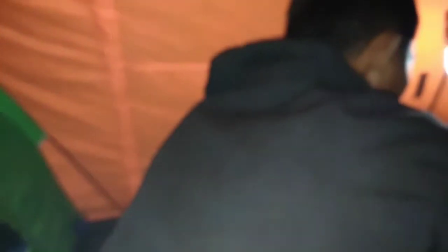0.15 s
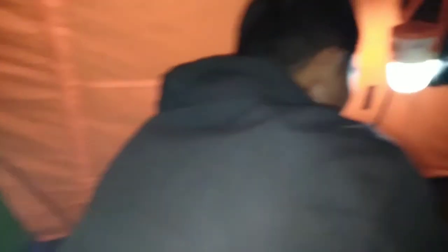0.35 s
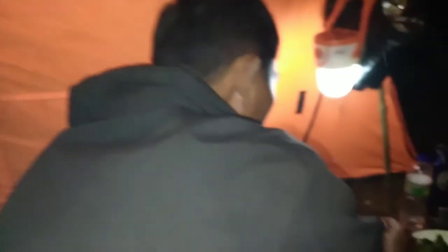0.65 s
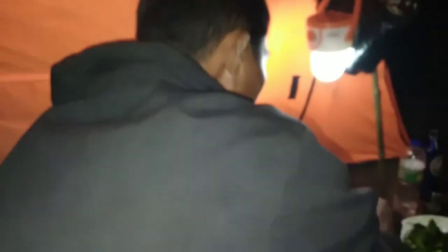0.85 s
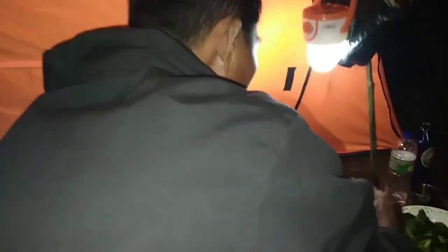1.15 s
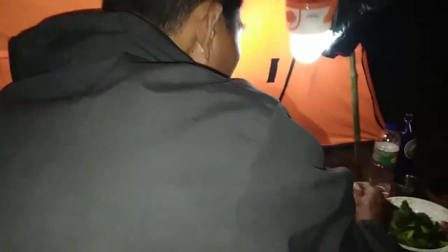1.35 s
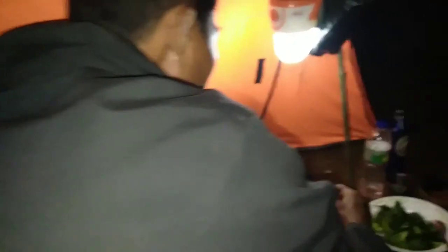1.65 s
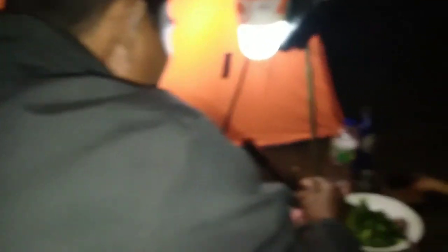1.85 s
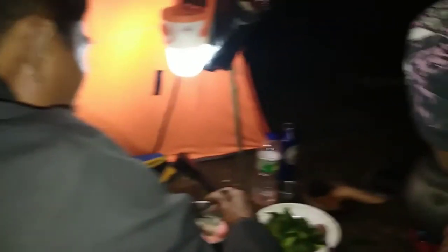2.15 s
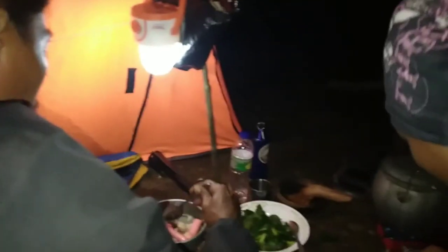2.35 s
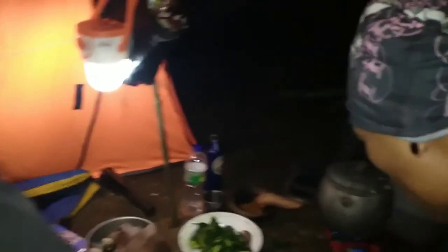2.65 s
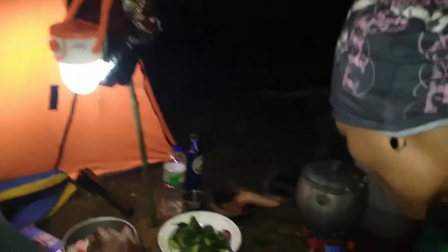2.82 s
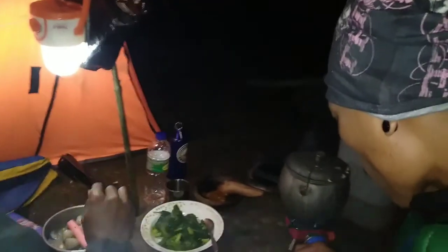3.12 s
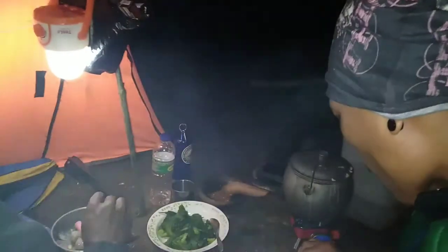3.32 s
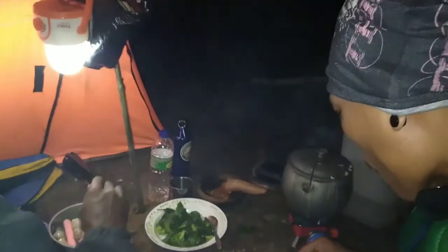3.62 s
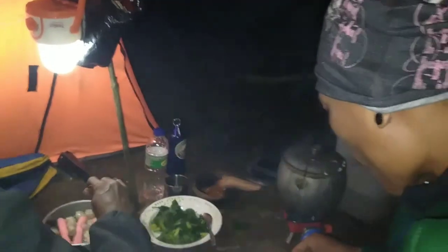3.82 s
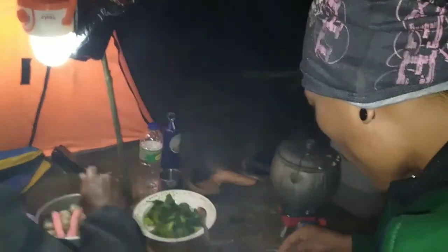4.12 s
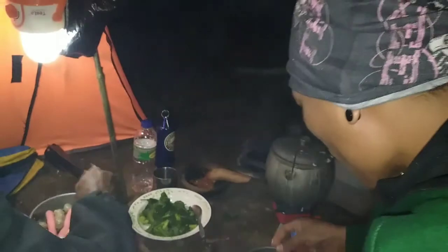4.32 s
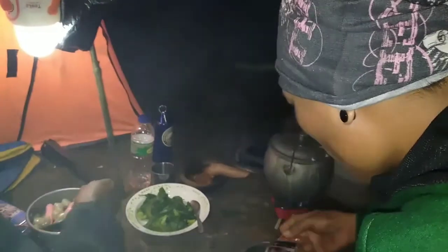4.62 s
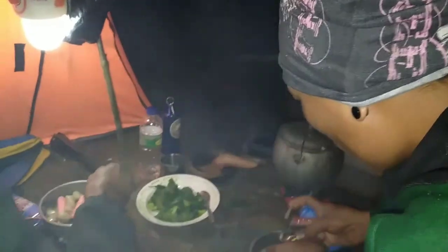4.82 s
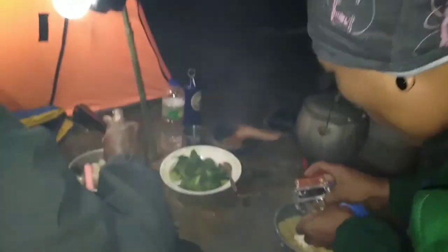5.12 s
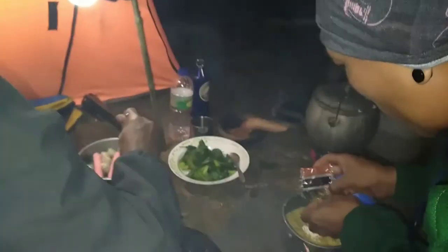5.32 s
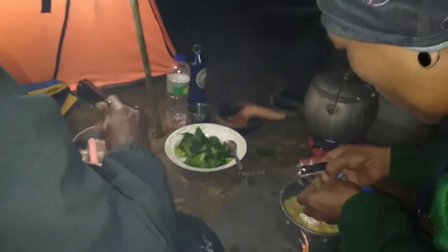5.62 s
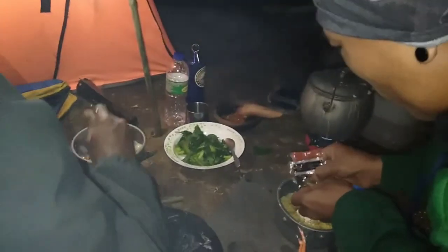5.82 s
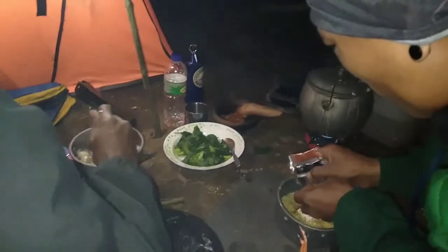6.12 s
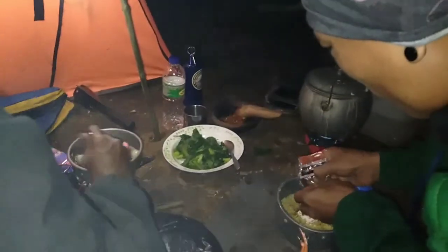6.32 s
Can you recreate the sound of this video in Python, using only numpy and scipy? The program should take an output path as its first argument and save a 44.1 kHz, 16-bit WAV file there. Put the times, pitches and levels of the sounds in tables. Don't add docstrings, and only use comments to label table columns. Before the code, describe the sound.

Outdoors at night, close to a phone microphone, a gas burner hisses steadily above a low fluttering flame rumble. Hands rustle thin plastic packaging almost constantly, with bright crackles and sharp knocks. Spoons tap and briefly scrape on plates, mostly in the first half. Late on, one hard metallic clank of a tin stands out, then lighter rustling and a last cluster of taps.

```python
import sys
import numpy as np
from scipy import signal
from scipy.fft import rfft, irfft
from scipy.io import wavfile
from scipy.ndimage import uniform_filter1d, map_coordinates

SR = 44100
rng = np.random.default_rng(int(sys.argv[2]) if len(sys.argv) > 2 else 0)


def wrap_up_sound(samples):
    columns = np.atleast_2d(samples).T
    tamed = np.clip(columns, -1, 1)
    steps = np.round(tamed * 32767).astype(np.int16)
    wavfile.write(sys.argv[1], SR, steps)


def convert_level_to_amplitude(level_db):
    exponent = np.asarray(level_db, float) / 20
    return 10 ** exponent


N = 285327
HZ = np.fft.rfftfreq(N, 1 / SR)

# f/Hz, level/dB
FLAME_SPECTRUM = [(15, -49), (25, -19.5), (90, 1), (129, 4), (179, 2), (295, -8), (1060, -11), (1310, -44),
                  (1500, -29), (1950, -85), (3300, -120)]
# f/Hz, level/dB
JET_SPECTRUM = [(710, -49), (1200, -44), (1510, -50), (1890, -13), (2320, -59), (2650, -10), (3110, -14),
                (3550, -2), (4450, -9.5), (6650, -9.5), (7910, -8), (9310, -2), (11400, -9.5), (15200, -7),
                (16000, -16)]
# t/s, level/dB
DRAUGHT = [(0, 1), (.4, -1.5), (1.5, 0.5), (2.4, 0), (3.8, 1), (4.7, -1), (5.2, -0.5), (5.7, 1), (6.1, 2),
           (6.47, 1)]
# t/s, delay of long waves at the left port/samples
TURN = [(0, -4), (1.4, -3), (2.2, 0), (3, 1.5), (5.22, 1.5), (5.27, 7), (5.4, 7), (5.45, 1.5), (6.47, 2.5)]
# f/Hz, level/dB
FILM_SPECTRUM = [(180, -63), (300, 5), (593, -24.5), (787, -21.5), (1120, -16), (1430, -23.5),
                 (1720, -22.5), (2070, -21), (3700, -13), (4590, -14.5), (6100, -14.5), (8090, -8),
                 (9300, 1.5), (10700, -9), (16000, -32)]
BAND_EDGES = (620, 2000, 6500, 11500, 16000)
LEFTWARD = np.array([-1.2, 7.0, 4.5, 1.5])
# t/s, rustle level/dB, weight of the grip/dB
BUSY = [(0, -40, 4), (.18, -29, -5), (.45, -28, -0.5), (.67, -23.5, -6.5), (.83, -27.5, 2.5),
        (1.19, -27, -10), (1.36, -28.5, 4.5), (1.93, -25.5, -10.5), (2.16, -26, -5.5), (2.65, -24, -6),
        (2.96, -22.5, -21), (3.22, -28, 0.5), (3.91, -26.5, -1), (4.45, -24, -10), (5.261, -31.5, -6),
        (5.58, -30.5, -6.5), (6.2, -25, -11.5), (6.47, -33, 0.5)]
# peak t/s, level/dB, build/s, fade/s, weight of the grip/dB
PULLS = [(0.108, -19.5, 0.058, .055, 7), (.4, -21.5, 0.092, 0.05, -0.5), (.74, -13, 0.046, 0.063, -2),
         (1.52, -23, 0.14, 0.14, 13), (2.03, -20, 0.088, 0.11, 13), (2.1, -34.5, 0.083, 0.13, 21.5),
         (2.43, -21.5, 0.04, 0.09, -14), (2.69, -20.5, 0.028, 0.14, 14.5), (2.92, -19.5, 0.11, 0.037, 4.5),
         (3.262, -20, 0.031, 0.052, 9.5), (3.55, -20.5, 0.14, 0.052, 5), (3.39, -20.5, 0.069, 0.025, 5.5),
         (4.03, -27.5, 0.053, 0.047, 12), (3.71, -22, 0.085, 0.11, 0.5), (4.12, -15, 0.11, 0.063, 6.5),
         (4.24, -21, 0.12, 0.14, 11), (5.92, -28.5, 0.031, 0.18, 4), (5.53, -15, 0.017, 0.033, -22),
         (6.31, -30.5, 0.069, 0.25, 16.5)]
RUSTLE_COLOUR = np.array([-14.0, -4.5, -3.5, -5.0])
PULL_COLOUR = np.array([-25.0, -9.5, -2.5, -5.0])
WEIGHT_SHARE = np.array([0.99, 0.47, 0.013, 0.2])
# t/s, peak level/dB, low f/Hz, high f/Hz, high minus low level/dB
TAPS = [(0.07, -24, 1010, 3780, -7), (.641, -22, 1054, 3800, -12), (.686, -21.5, 980, 3500, -10),
        (0.875, -16, 950, 3670, 0.5), (0.998, -19, 1180, 3970, -1), (1.357, -11.5, 1164, 5090, 9.5),
        (1.392, -12, 1090, 4170, -10), (1.569, -17.5, 1115, 4460, -3), (1.621, -17.5, 840, 3600, -18),
        (1.945, -13, 864, 3520, -11), (2.014, -19, 960, 3780, -9), (2.072, -16.5, 800, 4030, -10),
        (2.662, -14.5, 1180, 3700, -27), (2.761, -13.5, 1594, 4640, 3), (2.915, -19, 1095, 5100, -12),
        (3.255, -12, 1116, 3630, -12), (5.296, -1, 928, 2760, 0), (6.238, -24.5, 1370, 4600, 12),
        (6.297, -21, 1120, 4140, 7)]
# t/s, peak level/dB, body minus peak/dB, rasp minus peak/dB
KNOCKS = [(0.072, -14, -9.5, 0.5), (.2458, -14.5, -22, -30), (0.6404, -23, -3.5, 11),
          (.829, -12.5, -18.5, -8), (0.873, -21.5, -16, 1), (0.953, -11, -17, -14),
          (0.977, -13, -14.5, -10), (1.025, -26, -2, -7), (1.355, -3, -16, -3), (1.3887, -6.5, -15, -17),
          (1.558, -4.5, -28, -12), (1.75, -14, -12.5, -27), (1.938, -8.5, -9, -7.5),
          (2.1736, -20.5, -6, -6), (2.416, -13, -30, -18), (2.7596, -4, -32, -3), (2.8664, -13, -15.5, -4),
          (2.9086, -20, -21, -22), (3.254, -1.5, -17.5, -5.5), (3.525, -11, -21, -21),
          (4.0018, -8.5, -20, -22), (4.3974, -8, -19.5, -12.5), (5.184, -16.5, -15, -7),
          (5.273, -22, -31, -15), (5.2932, -22.5, 8.5, 21.5), (5.4093, -12, -21.5, -8.5),
          (5.878, -26, -26, 6), (6.2362, -6, -12.5, 0), (6.286, -12.5, -32, -4), (6.299, -9.5, -3, 3.5)]
# t/s, peak level/dB
CRINKLES = [(0.095, -2.5), (1.1607, -9), (1.8154, -6), (1.973, 0), (2.032, -1), (2.116, 4), (2.141, -5),
            (2.211, -14), (2.27, -3.5), (2.4844, -4.5), (2.5297, -6), (2.9963, -10), (3.113, -9),
            (3.411, -6), (3.549, -7), (3.691, -16), (4.083, -7), (4.6575, -8), (4.754, -6.5),
            (5.5286, -7.5), (5.594, -10.5), (5.6492, -9.5), (1.46, -30), (1.5, -10), (1.687, -7),
            (4.422, -10), (4.935, -18), (5.08, -14.5), (5.454, -15), (5.7, -28)]
# t/s, peak level/dB
CRACKS = [(.344, -5.5), (.6174, -7.5), (.699, -6), (.771, -18), (2.053, -1.5), (2.358, -18.5),
          (2.5144, -23), (2.672, -10), (2.679, -3), (3.0665, -10.5), (3.495, -10), (3.979, -18),
          (4.2486, -6), (4.363, -12.5), (4.6414, -3.5), (5.746, -12.5), (5.836, -9.5), (6.0445, -18),
          (6.126, -2), (6.1913, -21), (6.273, -6)]
# t/s, peak level/dB
TICKS = [(0.0727, -14), (0.2468, -26), (0.3401, -15), (0.4773, -17), (0.62, -11), (0.6679, -19),
         (0.7033, -23), (0.7277, -18), (0.7706, -12), (0.8734, -15), (1.3573, -15), (1.7489, -12),
         (1.939, -5), (2.3585, -28), (2.6723, -22), (2.76, -11), (3.0679, -21), (3.258, -10), (3.5374, -19),
         (3.7194, -15), (4.0821, -25), (4.2512, -23), (4.4004, -15), (4.643, -10), (4.8788, -16),
         (5.0409, -15), (5.4146, -20), (6.126, -20), (6.2382, -31), (6.3, -8)]
# t/s, length/s, level/dB, f/Hz
SCRAPES = [(.1, 0.07, -35.5, 3100), (.073, .086, -45, 1150), (.697, .044, -25, 7020),
           (.699, .066, -39, 2680), (1.545, 0.035, -33.5, 3300), (1.542, .057, -44, 1060),
           (2.673, .1, -29.5, 3700), (2.674, .12, -38.5, 1310), (2.863, .051, -34, 5200),
           (2.857, .04, -37, 1830), (2.883, .054, -41, 4350), (2.904, .04, -38, 1240),
           (3.256, .045, -29, 3900), (3.252, .054, -31, 3050), (4.081, .063, -26.5, 4640),
           (4.079, .076, -31, 3510), (4.206, 0.075, -31, 4580), (4.209, .068, -33.5, 3560),
           (5.881, .061, -35, 5470), (5.878, 0.09, -48, 2300), (6.251, .026, -39, 2830),
           (6.24, .05, -41, 1360)]
# t/s, length/s, level/dB, f/Hz
SWISHES = [(.073, 0.089, -32, 6360), (.075, .089, -31, 7700), (.073, .091, -37.5, 2900),
           (5.874, .071, -33.5, 5460), (5.871, .081, -40, 4300), (2.597, .021, -38.5, 2400),
           (2.597, .021, -33.5, 5100), (1.3555, .015, -23.5, 4400), (4.006, 0.056, -35, 6900),
           (3.976, 0.012, -26.5, 7700), (6.4, .015, -28, 7850), (5.181, .013, -32, 7800),
           (5.367, .011, -46, 1970), (5.401, 0.053, -44.5, 1920), (6.301, .031, -28, 6500),
           (5.44, 0.035, -32, 9400), (5.795, 0.048, -40.5, 3100), (1.02, .014, -32, 6700),
           (2.174, 0.014, -29.5, 7300), (.715, .06, -42, 1060), (4.84, 0.023, -44, 900),
           (5.52, .02, -37, 6500)]
# t/s, peak level/dB, rasp minus peak/dB
PRICKS = [(0.2108, -21, 0), (.557, -12, -12), (.605, -14, -10), (.736, -6, -10), (.789, -9, -12),
          (2.127, -9, -17), (2.158, -13, -15), (3.4975, -9, -15), (3.529, -11, -12), (3.541, -10, -15),
          (3.566, -10, -15), (3.72, -11, -15), (3.765, -13, -15), (5.531, -10, -10), (5.66, -19, -15),
          (0.306, -17, -5), (.388, -15, -20), (.423, -9, -2), (.977, -15, -15), (1.2481, -19, 3),
          (1.5, -14, -10), (1.645, -15.5, 2), (2.212, -15, -18), (2.4159, -12, -10), (2.453, -15, -15),
          (2.6723, -12, -5), (2.761, -5, -5), (2.766, -6, -5), (3.0674, -12.5, -11), (2.9971, -14, -15),
          (3.2226, -14, -15), (3.45, -16, 2.5), (3.691, -11, -15), (3.7878, -13, -19), (3.8422, -8, -15),
          (4.0892, -6, -2), (4.097, 2.5, -8.5), (4.112, -4, -10), (4.128, -1, -12), (4.2512, -8, -10),
          (4.27, -12, -3), (4.38, -7, -18), (4.5401, -16, -15), (4.815, -18, 0), (4.83, -10.5, -5),
          (4.8788, -12, -4.5), (4.9252, -15, -15), (4.94, -18, -12), (5.0418, -14, -8), (5.1163, -18, -17),
          (5.1432, -21, -1), (5.2745, -15, -15), (5.7189, -19, -15), (5.7936, -18, -2), (5.9713, -14, -15),
          (5.995, -13, -10), (6.0462, -14, -4), (6.143, -11, -15), (6.1913, -16, -1), (6.2901, -6, -13)]
# t/s, level/dB, f/Hz, length/s, left minus right level/dB
BUMPS = [
    (4.348, -22, 91, 0.037, -30),
    (4.407, -24, 87, 0.029, -30),
    (4.444, -38, 70, 0.053, -30),
    (5.349, -28, 360, 0.0079, 0),
    (5.945, -39.5, 140, 0.041, -1),
    (6.255, -38, 222, .06, -1),
    (6.02, -42, 190, .07, 1.5),
]
# f/Hz, level/dB, t60/s
TIN_MODES = [(229, -8.5, 1.1), (813, 2, 0.048), (1840, -2, 0.034), (2580, 8.5, 0.025), (3500, -2, 0.018),
             (4480, -7, 0.014), (5200, -2, 0.025), (5500, -24, 0.25), (495, -9, 0.034), (6540, -16, 0.059),
             (7600, -36, 0.38), (6900, 3, 0.015)]
# t/s, level/dB
TIN_BLOWS = [
    (5.2958, -11),
    (5.300, -12.5),
]


def level(x, db):
    return x * convert_level_to_amplitude(db) / np.sqrt(np.mean(x ** 2))


def colour(x, spectrum, lo_hz=1., hi_hz=3e4):
    hz, db = np.transpose(spectrum)
    f = HZ + 1
    edges = 1 / np.sqrt((1 + (lo_hz / f) ** 12) * (1 + (f / hi_hz) ** 12))
    return irfft(rfft(x) * convert_level_to_amplitude(np.interp(np.log(f), np.log(hz), db)) * edges, N)


def curve(rows):
    return np.interp(np.arange(N) / SR, *np.transpose(rows))


def walk(rate):
    k = int(SR / rate)
    steps = np.repeat(rng.standard_normal(N // k + 1), k)
    return 0.52 * uniform_filter1d(uniform_filter1d(steps, k), k)[:N]


def late(x, lag):
    return np.interp(np.arange(N) - np.round(lag), np.arange(N), x)


def ports(alike, lag):
    shared, left, right = rng.standard_normal((3, N))
    common = np.array([late(shared, lag), shared])
    return np.sqrt(alike) * common + np.sqrt(1 - alike) * np.array([left, right])


def patchy(x, depth_db, wide_hz, long_s):
    cells = signal.stft(x, nperseg=512)[2]
    coarse = rng.standard_normal((200, 800))
    pitch = np.arange(257) * SR / 512 / wide_hz
    time = np.arange(cells.shape[-1]) * 256 / SR / long_s
    grid = np.meshgrid(pitch, time, indexing="ij")
    field = convert_level_to_amplitude(depth_db * map_coordinates(coarse, grid, order=1, mode="wrap"))
    return signal.istft(cells * field, nperseg=512)[1][..., :N]


def ring(hz, t60, length=.25):
    t = np.arange(int(length * SR)) / SR
    return np.sin(2 * np.pi * hz * t) * np.exp(-np.log(1000) * t / t60)


def add(out, sound, s):
    i = int(s * SR)
    out[..., i:i + sound.shape[-1]] += sound[..., :N - i]


def stove():
    flame_db = -46
    flame = level(colour(ports(0.93, lag=0), FLAME_SPECTRUM), flame_db)
    flame = flame * convert_level_to_amplitude(3.8 * walk(50) + curve(DRAUGHT))
    air = level(colour(ports(0, lag=0), FLAME_SPECTRUM, hi_hz=112.0), flame_db - 33.0)
    air = air * convert_level_to_amplitude(np.array([[-9.], [3.]]))
    hiss = patchy(ports(0.14, lag=-1.6), depth_db=3.5, wide_hz=198.0, long_s=.06)
    shaded = [colour(port, [(1200, 0), (4400, db), (8000, 1.3 * db), (15000, -.5 * db)])
              for port, db in zip(hiss, (2.5, -2.5))]
    jet = level(colour(np.array(shaded), JET_SPECTRUM), -33.5) * convert_level_to_amplitude(0.28 * walk(23.3))
    return flame + air + jet


def creases(rate, spread_db, t60):
    when, size = rng.random(N), rng.exponential(size=N)
    kicks = (when < rate / SR) * convert_level_to_amplitude(spread_db * np.minimum(size, 4)) ** 2
    fall = np.exp(-2 * np.log(1000) / (t60 * SR))
    power = signal.lfilter([1], [1, -fall], kicks)
    return np.sqrt(power / power.mean())


def film_bands(patch_share=1):
    near = patchy(ports(0.44, lag=curve(TURN)), depth_db=6.2 * patch_share, wide_hz=170.7, long_s=.035)
    scattered = patchy(ports(0.083, lag=6), depth_db=4.1 * patch_share, wide_hz=198.4, long_s=.03)
    sides = convert_level_to_amplitude(np.outer(LEFTWARD, [.5, -.5]))[..., None]
    edges = zip((near, scattered, scattered, scattered), BAND_EDGES, BAND_EDGES[1:])
    return sides * [level(colour(noise, FILM_SPECTRUM, lo, hi), 0) for noise, lo, hi in edges]


def band_power(db, colour_db, weight):
    return convert_level_to_amplitude(db + np.reshape(colour_db, (4, 1)) + np.reshape(WEIGHT_SHARE, (4, 1)) * weight) ** 2


def handling(bands):
    t = np.arange(N) / SR
    s, db, weight = np.transpose(BUSY)
    power = band_power(np.interp(t, s, db), RUSTLE_COLOUR, np.interp(t, s, weight))
    for s, db, build, fade, weight in PULLS:
        away = np.maximum((s - t) / build, (t - s) / fade) ** 1.65
        power = power + band_power(0, PULL_COLOUR, weight) * convert_level_to_amplitude(db - 12 * away) ** 2
    fine = creases(rate=500.0, spread_db=2.0, t60=0.025)
    coarse = .26 * np.log(1e-3 + creases(rate=200.0, spread_db=4.0, t60=0.07))
    crackle_share = 0.11
    separate = creases(rate=70., spread_db=0.5, t60=0.038) ** 2
    crackle = np.sqrt(1 - crackle_share * (1 - separate))
    gate = convert_level_to_amplitude(-2.5) * crackle * fine ** 0.27 * np.exp(coarse)
    return gate * (np.sqrt(power)[:, None] * bands).sum(axis=0)


def taps():
    out = np.zeros(N)
    t60 = 0.042
    for s, db, low_hz, high_hz, high_db in TAPS:
        contact = np.diff(rng.standard_normal(256) * np.exp(-np.arange(256) / SR / 0.0022))
        low_modes = (ring(low_hz, t60) + 0.5 * ring(1.1 * low_hz, 1.28 * t60)
                     + 0.27 * ring(1.47 * low_hz, 0.15 * t60) + 0.076 * ring(0.54 * low_hz, 0.5 * t60))
        high_modes = (ring(high_hz, 0.77 * t60) + 0.64 * ring(1.093 * high_hz, 0.66 * t60)
                      + 0.58 * ring(0.68 * high_hz, 0.42 * t60) + 0.39 * ring(0.28 * high_hz, 0.35 * t60))
        low = np.convolve(contact, low_modes)
        high = np.convolve(contact, high_modes)
        both = low / low.max() + convert_level_to_amplitude(high_db + 4.5) * high / high.max()
        add(out, convert_level_to_amplitude(db - 6.0) * both, s)
    return np.array([late(out, curve(TURN)), out])


def snaps(bands):
    gate = np.zeros((4, N))
    t = np.arange(int(.15 * SR)) / SR
    events = [(*e, -33, -38, 0.036) for e in CRINKLES]
    events += [(*e, -36, -11.5, 0.035) for e in CRACKS]
    events += [(*e, 0.069) for e in KNOCKS]
    for s, db, body, rasp, t60 in events:
        shape = np.minimum(t / 0.002, 1) * np.exp(-np.log(1000) * t / t60)
        add(gate, convert_level_to_amplitude(db - 6.0 + np.array([[body], [rasp], [0], [-13]])) * shape, s)
    ragged = creases(rate=2000.0, spread_db=6.5, t60=0.018) ** 0.34
    return ragged * (gate[:, None] * bands).sum(axis=0)


def ticks():
    gate = np.zeros(N)
    t = np.arange(int(.03 * SR)) / SR
    for s, db in TICKS:
        add(gate, convert_level_to_amplitude(db - 5.5) * np.minimum(t / 0.00065, 1) * np.exp(-t / 0.0058), s)
    bright = colour(ports(0.15, lag=2.6), [(2000, -42), (6000, -26), (12000, 11), (16000, 13)])
    return gate * level(bright, 0) * convert_level_to_amplitude(np.array([[-.8], [.8]]))


def drag(length, db, hz, turns, steep=False):
    t = np.arange(int(length * SR)) / SR
    slip = rng.standard_normal((2, SR // 2))[:, :len(t)]
    slip = slip * np.minimum(t / 0.0025, 1) * np.minimum((length - t) / 0.016, 1)
    slip[1] = 0.17 * slip[0] + 0.41 * slip[1]
    mode = ring(hz, turns / hz, 0.0083)
    if steep:
        mode = np.convolve(mode, mode)
    return level(signal.fftconvolve(slip, mode[None], axes=1), db)


def scrapes():
    out = np.zeros((2, N))
    for s, length, db, hz in SCRAPES:
        add(out, drag(length, db, hz, turns=72.0), s)
    return out * creases(rate=620.0, spread_db=2.0, t60=0.021) ** .5


def swishes():
    out = np.zeros((2, N))
    for s, length, db, hz in SWISHES:
        add(out, drag(length, db, hz, turns=9.8, steep=True), s)
    return out * creases(rate=900.0, spread_db=3.0, t60=0.011) ** 0.43


def pricks(bands):
    gate = np.zeros((4, N))
    t = np.arange(int(.04 * SR)) / SR
    shape = np.minimum(t / .0008, 1) * np.exp(-np.log(1000) * t / 0.018)
    for s, db, rasp in PRICKS:
        add(gate, convert_level_to_amplitude(db - 8.5 + np.array([[1.9 * rasp - 12], [rasp], [0], [-8.]])) * shape, s)
    return (gate[:, None] * bands).sum(axis=0)


def bumps():
    out = np.zeros((2, N))
    for s, db, hz, length, left_db in BUMPS:
        t = np.arange(int(length * SR)) / SR
        thud = np.sin(np.pi * t / length) ** 0.18 * np.sin(2 * np.pi * hz * t)
        add(out, convert_level_to_amplitude(db + np.array([[left_db], [0]])) * thud, s)
    return out


def tin():
    body = sum(convert_level_to_amplitude(db) * ring(hz, min(t60, .14)) for hz, db, t60 in TIN_MODES)
    body = body * np.minimum(np.arange(len(body)) / SR / .0022, 1)
    blows = np.zeros(N)
    for s, db in TIN_BLOWS:
        add(blows, convert_level_to_amplitude(db) * body, s)
    left, right = (colour(blows, [(300, 0), (800, db), (1500, 0), (2600, -1.3 * db)]) for db in (-2.5, 2.5))
    return np.array([np.roll(left, 5), right])


def scene():
    rustle, crisp = handling(film_bands()), film_bands(patch_share=0.65)
    hands = rustle + snaps(crisp) + pricks(crisp) + ticks() + scrapes() + taps()
    return hands + tin() + bumps() + stove() + swishes()


def top_cut(x):
    return signal.sosfilt(signal.butter(12, 15900, fs=SR, output="sos"), x)


def record(dry):
    firm = signal.sosfilt(signal.butter(3, 50., "high", fs=SR, output="sos"), dry)
    rounded = np.tanh(1.3 * firm) / 1.3
    cut = signal.sosfilt(signal.ellip(8, .2, 70, 15900, fs=SR, output="sos"), rounded)
    return top_cut(cut)


dry = scene()
out = record(dry)
wrap_up_sound(out)
```